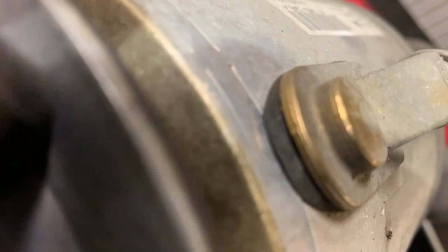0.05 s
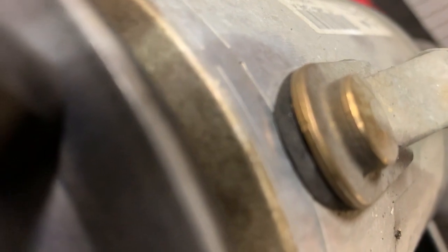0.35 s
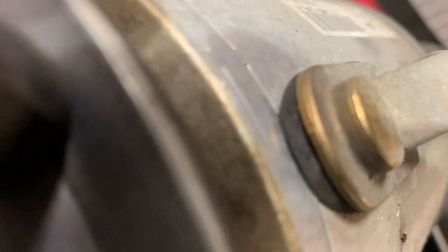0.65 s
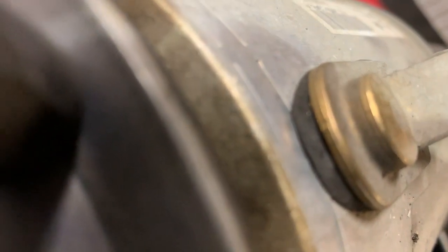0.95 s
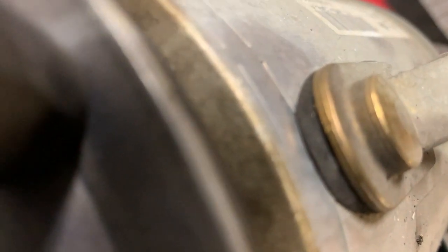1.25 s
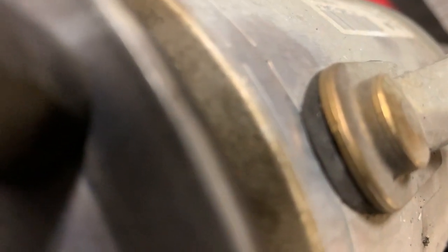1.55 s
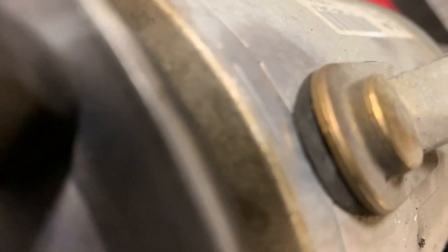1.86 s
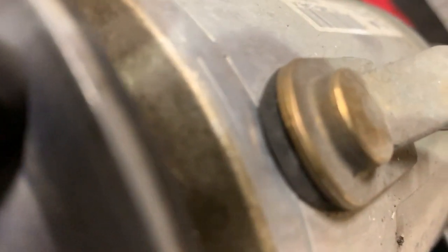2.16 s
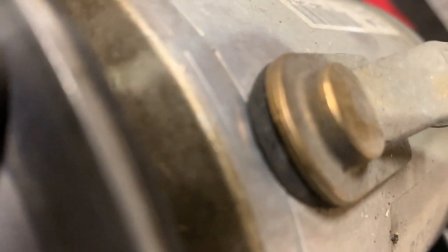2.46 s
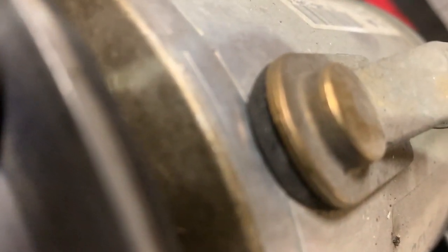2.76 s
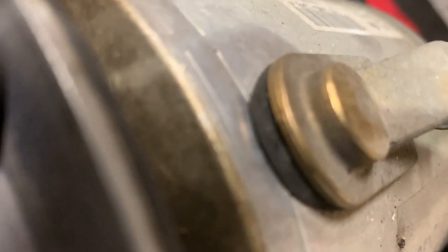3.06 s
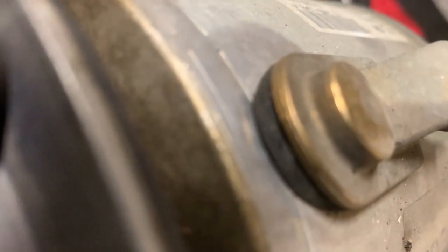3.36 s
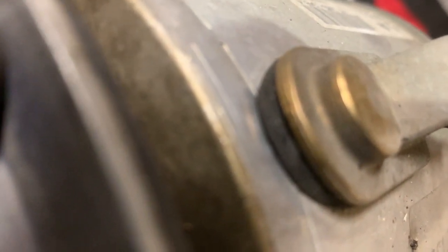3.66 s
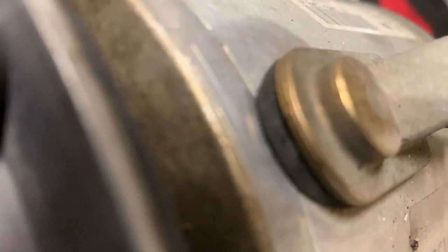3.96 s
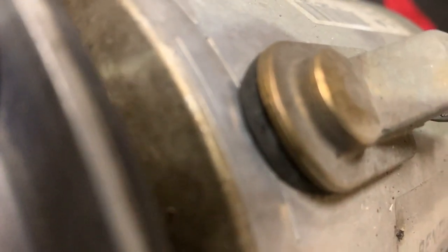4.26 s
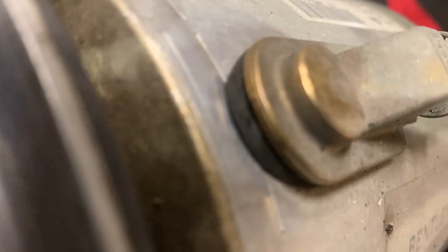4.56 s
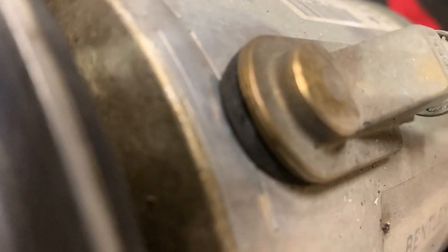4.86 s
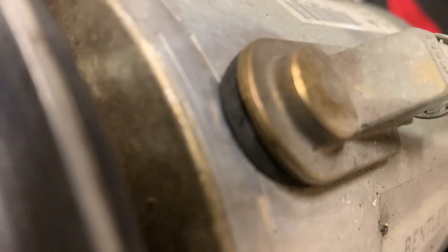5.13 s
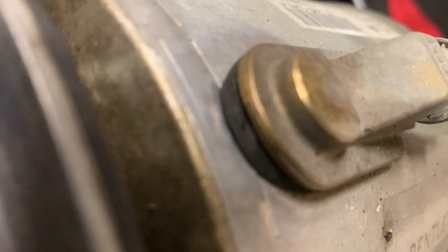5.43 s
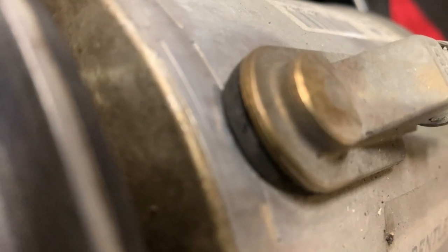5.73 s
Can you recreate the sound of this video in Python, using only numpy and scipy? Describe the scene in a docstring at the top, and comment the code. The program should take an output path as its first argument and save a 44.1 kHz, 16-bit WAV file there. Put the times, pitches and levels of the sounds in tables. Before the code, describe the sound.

Compressed air hisses steadily into a metal part, briefly ringing with faint breathy whistles three times, over a low machine hum.

```python
"""A blow gun hisses without a break, feeding compressed air into a metal suspension part in a workshop.
Three times the jet catches the hollow of the part, which rings with breathy modes and faint whistles.
Midway the jet turns into the hollow and adds a steady wash; a dull rush of air runs throughout.
Underneath, a low machine hum and its rumble swell. Two microphone ports hear it from close by."""
import sys
import numpy as np
from scipy.fft import rfft, irfft, next_fast_len
from scipy.io import wavfile
from scipy.ndimage import map_coordinates

SR = 44100
rng = np.random.default_rng(int(sys.argv[2]) if len(sys.argv) > 2 else 0)


def dump(signal):
    """Clip the signal to [-1, 1] and save it as 16-bit WAV at the path in sys.argv[1]."""
    limited = np.clip(np.atleast_2d(signal).T, -1, 1)
    pcm = np.round(limited * 32767).astype(np.int16)
    wavfile.write(sys.argv[1], SR, pcm)


N = 255339

# left-right likeness of the jet noise: f/Hz, likeness/0-1
JET_LIKENESS = [(1000, .85), (1500, .8), (1900, 1), (2600, .5), (3500, .7), (3850, 1), (4200, 1),
                (4600, .75), (5300, .65), (6000, .75), (6450, 1), (6950, 1), (7800, .88), (10500, .91),
                (11300, 1), (11800, 1), (12600, .9), (15500, .89)]
OPENING_PAN_DB = [[-2], [2]]  # left, right: the opening faces the right port


def amp(db):
    """Decibels to gain."""
    return 10 ** (np.asarray(db) / 20)


def unit(x):
    """Scale to rms 1."""
    return x / np.sqrt(np.mean(x ** 2) + 1e-20)


def along(points, hz):
    """Read (f/Hz, value) points on a log frequency axis."""
    f, values = np.transpose(points)
    return np.interp(np.log(hz + 1), np.log(f + 1), values)


def curve(points):
    """Read (t/s, value) points at every sample."""
    return np.interp(np.arange(N) / SR, *np.transpose(points))


def ramp(start_s, length_s):
    """Linear rise from 0 to 1, then constant."""
    return np.clip((np.arange(N) / SR - start_s) / length_s, 0, 1)


def held(start_s, end_s, attack_s, release_s):
    """Attack from the start, hold to the end, then release."""
    return ramp(start_s, attack_s) * (1 - ramp(end_s, release_s))


def wobble(rate_hz):
    """Smooth random curve with knots at rate_hz."""
    knots = rng.standard_normal(int(N * rate_hz / SR) + 4)
    return map_coordinates(knots, [np.arange(N) * rate_hz / SR])


def filtered(x, response):
    """Apply a complex frequency response."""
    size = next_fast_len(N + SR // 2)
    return irfft(rfft(x, size) * response(np.fft.rfftfreq(size, 1 / SR)), size)[..., :N]


def resonance(hz, centre_hz, width_hz):
    """Response of one damped mode, 1 at its centre."""
    return 1j * hz * width_hz / (centre_hz ** 2 - hz ** 2 + 1j * hz * width_hz)


def noise(colour, likeness):
    """Stereo noise of rms 1, shaped by colour(hz) and (f/Hz, left-right likeness) points."""
    def mid_side_gains(hz):
        angle = np.arccos(np.clip(along(likeness, hz), -1, 1)) / 2
        return colour(hz) * np.array([np.cos(angle), np.sin(angle)])
    mid, side = filtered(rng.standard_normal((2, N)), mid_side_gains)
    return unit(np.array([mid + side, mid - side]))


def turbulence(spectrum, likeness):
    """Stereo noise of rms 1, shaped by (f/Hz, level/dB) points."""
    return noise(lambda hz: amp(along(spectrum, hz)), likeness)


def machine(wander_hz=0.552, throb_hz=12, throb_db=1.4):
    """Unsteady, throbbing hum pitched by the machine's speed; the rumble swells ahead of it."""
    pitch = [(0, 58.66), (1.3, 58.6), (1.8, 60.6), (3.3, 60.53), (4.2, 59.16), (5.79, 58.4)]  # hum fundamental: t/s, f/Hz
    partials = [(1, -3), (2, -19.5), (3, -32)]  # hum harmonics: order, relative level/dB
    rumble_spectrum = [(15, -19), (28, -13), (40, -5), (60, 6.5), (80, 4), (105, 1.5), (135, -1.5),
                       (165, -7.5), (250, -15), (450, -20), (1000, -64)]  # rumble shape: f/Hz, level/dB
    phase = 2 * np.pi * np.cumsum(curve(pitch) + wander_hz * wobble(14)) / SR
    hum = unit(sum(amp(db) * np.sin(order * phase) for order, db in partials))
    throb = np.sin(2 * np.pi * np.cumsum(throb_hz + wobble(3.14)) / SR)
    rumble_db = curve([(0.65, -49), (3, -41.5)]) + wobble(3.1)
    rumble = turbulence(rumble_spectrum, likeness=[(60, 0.93)])
    hum_db = curve([(2, -46), (4.3, -28.7)]) + throb_db * throb + wobble(16)
    return amp(hum_db) * hum + amp(rumble_db) * rumble


def dull_rush(gain_db=2.0, waver_db=0.56):
    """Low body of the air stream."""
    levels = [(0, -49), (.35, -47.5), (.8, -49.5), (1.7, -47.5), (2.35, -50.5), (3.1, -48), (3.9, -46.5),
              (4.8, -53), (5.2, -50), (5.79, -48)]  # rush strength: t/s, relative level/dB
    spectrum = [(90, -12), (180, 0.5), (380, 2.5), (600, -2), (850, -12.5), (1400, -12), (2200, -14.5),
                (3000, -23), (6000, -67)]  # rush shape: f/Hz, level/dB
    likeness = [(250, 1), (550, 0.95), (800, 0.35), (1100, 0.27), (1900, 1), (2500, 0.55)]  # left against right: f/Hz, likeness/0-1
    return amp(curve(levels) + gain_db + waver_db * wobble(6.1)) * turbulence(spectrum, likeness)


def whistles(fade_s=0.076):
    """The jet locks loosely onto single modes at the opening: narrow bands of noise."""
    bands = [(-.1, .38, 5297, 32, -49.8), (.38, .72, 5297, 32, -46.8), (2.6, 3.25, 5285, 34, -54),
             (2.6, 3.1, 4815, 40, -52.5), (2.6, 3.25, 4250, 45, -54.5), (-.1, .27, 1822, 14, -52.5),
             (.27, .7, 1822, 20, -59.5), (2.6, 2.76, 1822, 20, -56), (2.76, 2.97, 1822, 14, -51),
             (2.62, 3.28, 1325, 45, -57.5), (5.08, 5.36, 1325, 60, -54.8), (2.65, 3.3, 8700, 100, -43),
             (5.2, 5.37, 8700, 80, -37)]  # whistles: start/s, end/s, f/Hz, nominal width/Hz, level/dB before pan
    t = np.arange(N) / SR
    pair = np.zeros((2, N))
    for start_s, end_s, centre_hz, width_hz, db in bands:
        gate = np.clip(np.minimum(t - start_s, end_s - t) / fade_s + .5, 0, 1)
        band = noise(lambda hz: resonance(hz, centre_hz, 2 * width_hz) ** 2, likeness=[(1000, 0.072)])
        pair += amp(db) * gate * band
    return pair * amp(OPENING_PAN_DB)


def catch(start_s, end_s, ring_db, edge_db, scatter_db=2.0):
    """Air rushes over the edge and sounds pipe-like modes; each catch's new angle reweights them."""
    modes = [(1325, 110, -4), (1825, 60, -8), (3290, 110, -1.5), (3490, 130, -3), (3790, 190, -1),
             (4250, 130, -1), (4820, 120, 2.5), (5295, 150, 4), (5635, 160, 4), (6230, 220, 0),
             (6600, 140, 3), (7180, 120, 3.5), (7680, 140, 5), (8700, 200, 7)]  # modes of the hollow: f/Hz, nominal width/Hz, relative level/dB
    edge_spectrum = [(400, -16), (800, -3), (1100, -.5), (1600, -1), (2100, -3), (2750, .5), (3200, -2),
                     (3550, -6), (4000, 1), (4500, -4), (5100, -5), (6000, -2), (7000, -3), (12000, -20)]  # edge rush shape: f/Hz, level/dB
    likeness = [(1300, .07), (5600, .15), (6400, 0.92)]  # left against right: f/Hz, likeness/0-1
    offsets_db = scatter_db * rng.standard_normal(len(modes))

    def ring_colour(hz):
        responses = [amp(db + offset_db) * resonance(hz, centre_hz, width_hz) ** 2
                     for (centre_hz, width_hz, db), offset_db in zip(modes, offsets_db)]
        return np.linalg.norm(responses, axis=0)  # modes add in power
    ring = amp(ring_db) * noise(ring_colour, likeness)
    edge = amp(edge_db) * turbulence(edge_spectrum, likeness)
    return held(start_s, end_s, attack_s=.08, release_s=.08) * (ring + edge)


def hollow(jet_db, graze_db=-23, idle_db=-32, wash_db=-14, wash_growth=1.57, sputter_db=0.6):
    """The jet grazes the hollow, slips off, then turns in and stays: a wash, ringing at each catch."""
    catches = [(-.1, 0.68, -16.8, -21.5), (2.568, 3.22, -13.5, -17.3), (5.03, 5.35, -16.5, -16.3)]  # jet on the opening: start/s, end/s, ring/dB, edge rush/dB (both re jet)
    wash_spectrum = [(600, -32), (1000, -19), (1700, -11), (2000, -7), (2330, -2), (2900, -9), (3250, -15),
                     (3500, -9.5), (3900, -19), (4200, -9), (4600, -2.5), (4820, -6.5), (5020, 1.5),
                     (5250, 3), (5600, 2), (5800, 3), (6250, 1), (8000, -4), (12000, -25)]  # wash shape: f/Hz, level/dB
    ring = amp(jet_db + sputter_db * wobble(45)) * sum(catch(*row) for row in catches)
    grazing = 1 - ramp(start_s=catches[0][1], length_s=0.84)
    turned_in = ramp(start_s=2.26, length_s=1)
    inside = amp(idle_db) + amp(graze_db) * grazing + (amp(wash_db) - amp(idle_db)) * turned_in
    flow_db = jet_db.mean() + wash_growth * (jet_db - jet_db.mean()) + 1.16 * wobble(40)
    wash = inside * amp(flow_db) * turbulence(wash_spectrum, JET_LIKENESS)
    return ring * amp(OPENING_PAN_DB) + wash


def jet(jet_db, spray_offset_db=-14.0, spray_follow=0.42):
    """The free jet flutters as eddies leave the nozzle; its finest spray swells less than its hiss."""
    hiss_spectrum = [(700, -36), (1000, -23.5), (2000, -21), (2350, -17), (2800, -21), (3200, -22),
                     (3500, -15.3), (3800, -19.5), (4300, -18.5), (4800, -23.5), (5050, -21), (5300, -23.5),
                     (5550, -17.5), (5850, -17.5), (6230, -9.8), (7100, -4.5), (8400, -.3), (9800, .5),
                     (11800, -5), (16000, -22)]  # hiss shape: f/Hz, level/dB
    spray_spectrum = [(9000, -30), (11400, -12), (12800, -.5), (14300, -2.5), (15200, 0), (16000, -2)]  # spray shape: f/Hz, level/dB
    flutter_db = 0.33 * wobble(90) + 0.39 * wobble(600)
    hiss = amp(jet_db + 0.3 * wobble(45)) * turbulence(hiss_spectrum, JET_LIKENESS)
    spray_db = spray_offset_db + spray_follow * jet_db + 0.23 * wobble(60)
    spray = amp(spray_db) * turbulence(spray_spectrum, JET_LIKENESS)
    return amp(flutter_db) * (hiss + spray)


def at_ports(pair, lag_ms):
    """Sound reaches the right port first, partly via the metal, which favours the left in the mids."""
    bend = [(60, 0), (250, .6), (740, 1.8), (860, -.9), (1300, .6), (1650, 0), (1850, -.6), (2000, -.4),
            (2150, 1.8), (2600, 2), (3150, 1.1), (3300, -1.4), (3800, 1.95), (4200, 2.5), (4550, 4.2),
            (5000, 6.2), (5600, 7.2), (6000, 6), (6400, 5.55), (7000, 6.28)]  # phase shift from reflections off the metal: f/Hz, left lead/rad
    balance = [(360, -1.5), (600, 8), (800, 13), (1300, 6), (1650, 5), (2000, 2.5), (2800, 5), (3500, 1),
               (4400, 0), (8000, 0)]  # left minus right: f/Hz, level/dB
    halves = np.array([[.5], [-.5]])

    def response(hz):
        lead_rad = along(bend, hz) - 2 * np.pi * hz * lag_ms / 1000
        return np.exp(1j * lead_rad * halves) * amp(along(balance, hz) * halves)
    return filtered(pair, response)


def spread(pair, start_s=.55, end_s=2.05, first_hz=360, last_hz=300, half_width_hz=55, side_db=2):
    """For a while one low band moves from the centre to the sides, sinking in frequency."""
    share = held(start_s, end_s, attack_s=0.2, release_s=0.25)
    phase = 2 * np.pi * np.cumsum(curve([(start_s, first_hz), (end_s, last_hz)])) / SR
    carriers = np.array([np.cos(phase), np.sin(phase)])
    # gliding band-pass: shift down, low-pass, shift back
    baseband = filtered(carriers * pair.mean(0), lambda hz: 1 / (1 + (hz / half_width_hz) ** 4))
    band = 2 * np.sum(carriers * baseband, axis=0)
    sides = amp(side_db) * np.array([band, -band])
    return pair + share * (sides - band)


def scene(nozzle_db=3.0):
    """One jet, off to the right, drives hiss and hollow; the hum fills the room."""
    strength = [(0, -33), (.55, -32), (1.5, -33.5), (2.5, -33), (3.12, -29), (4, -30.5), (5.0, -32),
                (5.12, -29), (5.32, -28), (5.5, -28.5), (5.79, -29)]  # jet strength: t/s, relative level/dB
    jet_db = nozzle_db + curve(strength)
    air = jet(jet_db) + hollow(jet_db) + whistles() + dull_rush()
    return spread(at_ports(air, lag_ms=0.2149) + machine())


def record(dry, notch_hz=3130, width_hz=380, depth=0.57, top_hz=15730):
    """The microphone ports absorb part of one narrow band; nothing passes above the band limit."""
    return filtered(dry, lambda hz: (1 - depth * resonance(hz, notch_hz, width_hz)) * (hz < top_hz))


dry = scene()
out = record(dry)
dump(out)
```